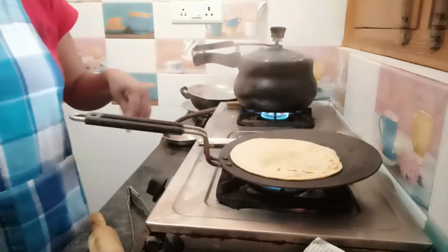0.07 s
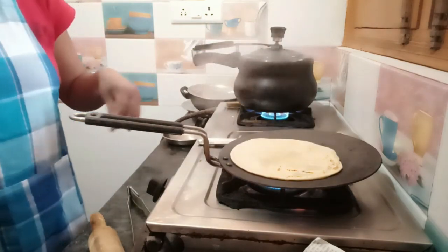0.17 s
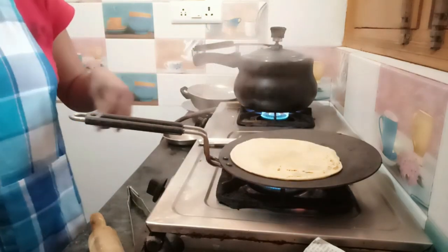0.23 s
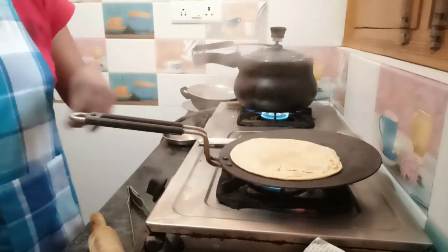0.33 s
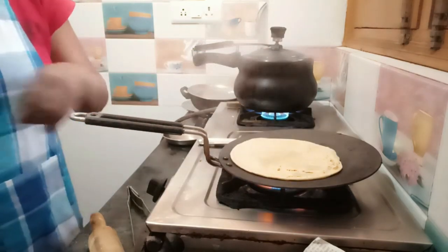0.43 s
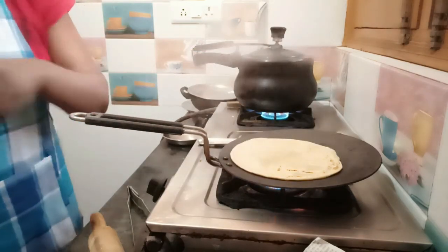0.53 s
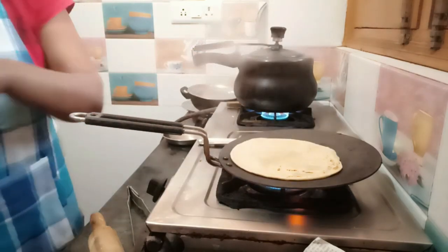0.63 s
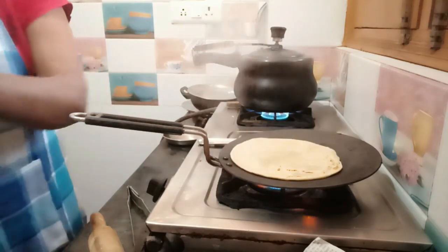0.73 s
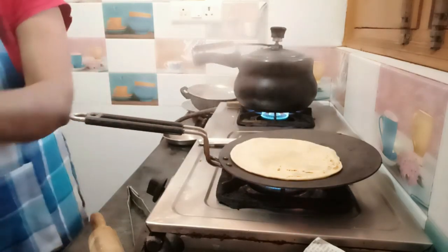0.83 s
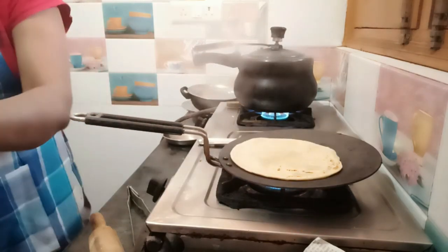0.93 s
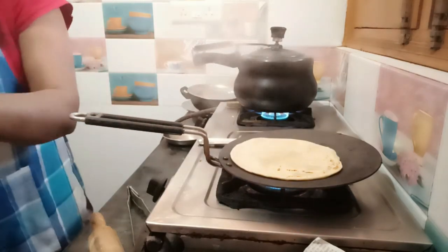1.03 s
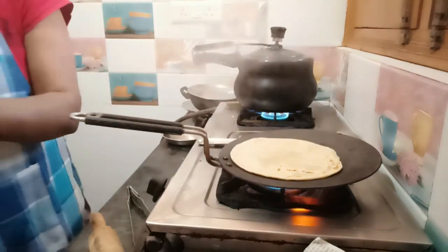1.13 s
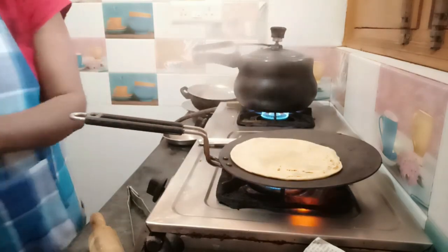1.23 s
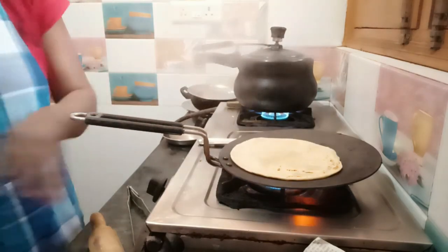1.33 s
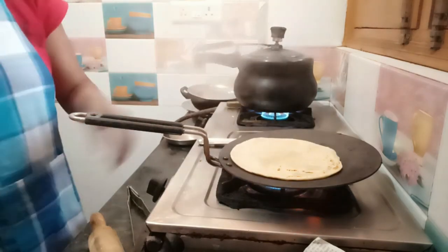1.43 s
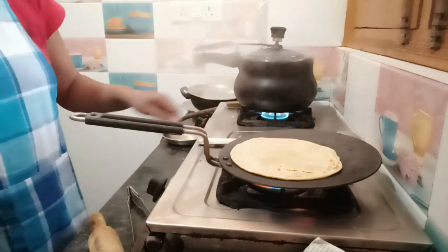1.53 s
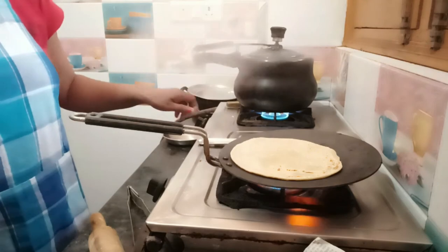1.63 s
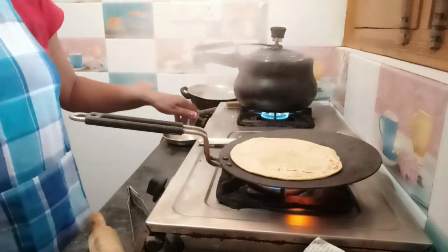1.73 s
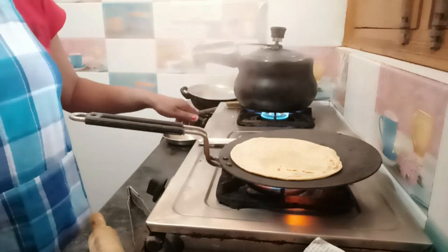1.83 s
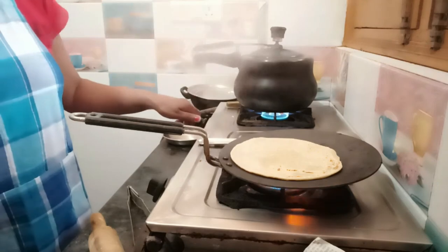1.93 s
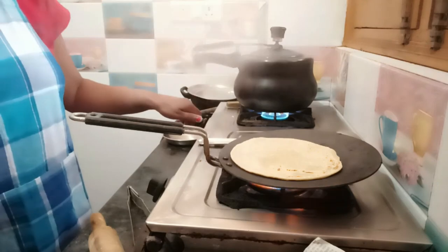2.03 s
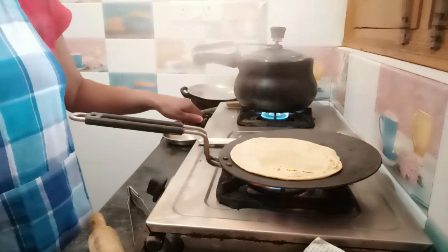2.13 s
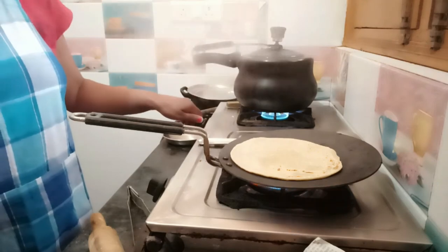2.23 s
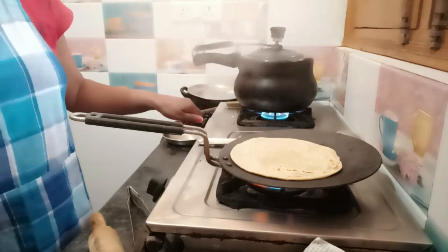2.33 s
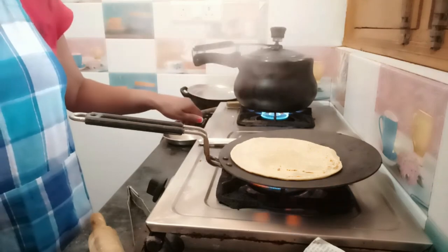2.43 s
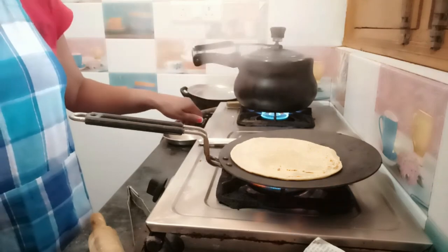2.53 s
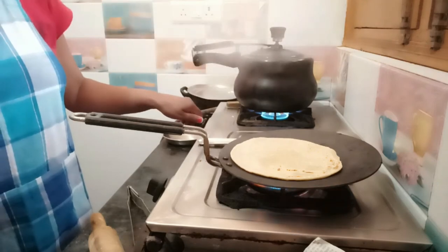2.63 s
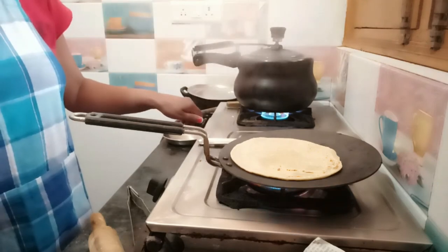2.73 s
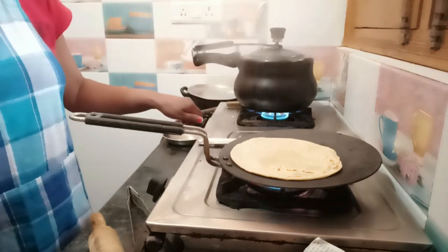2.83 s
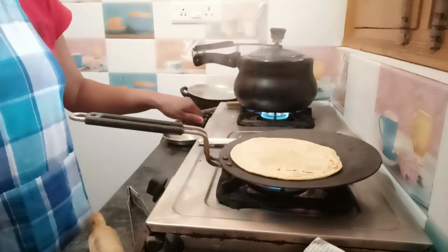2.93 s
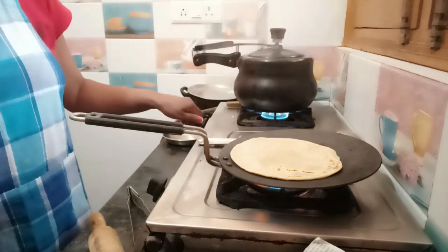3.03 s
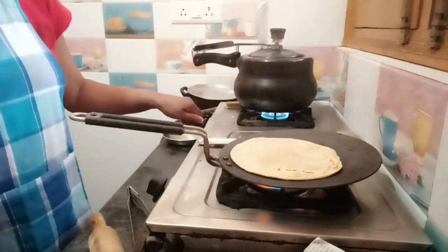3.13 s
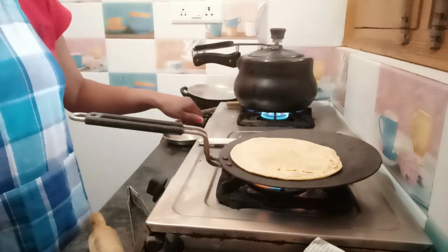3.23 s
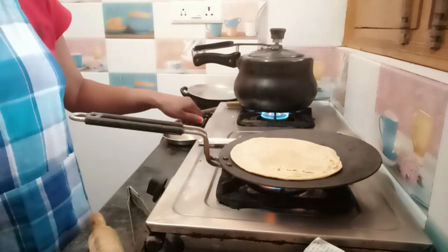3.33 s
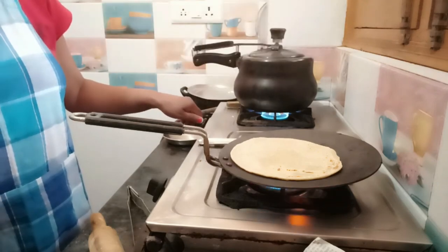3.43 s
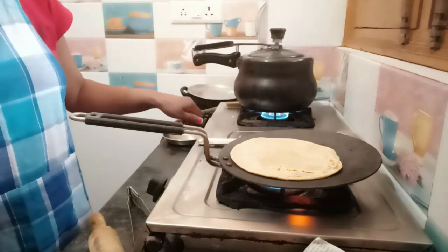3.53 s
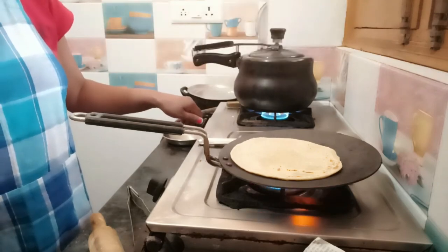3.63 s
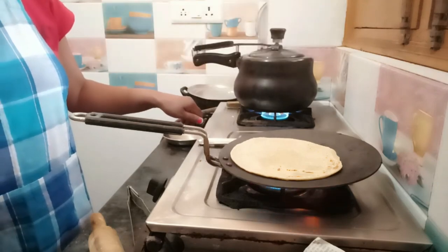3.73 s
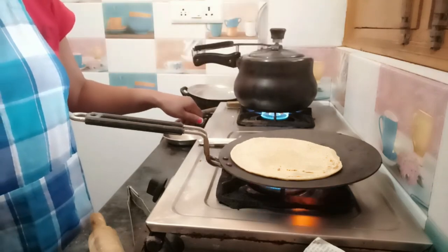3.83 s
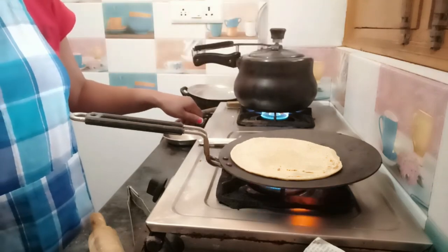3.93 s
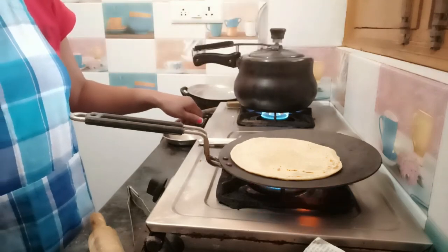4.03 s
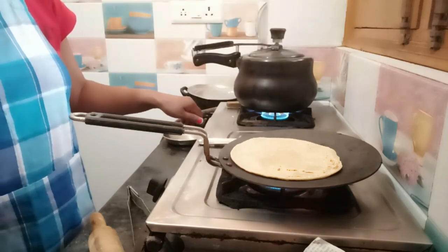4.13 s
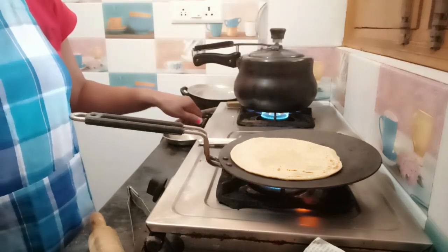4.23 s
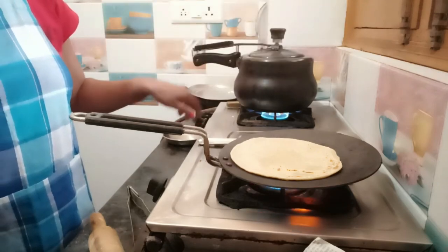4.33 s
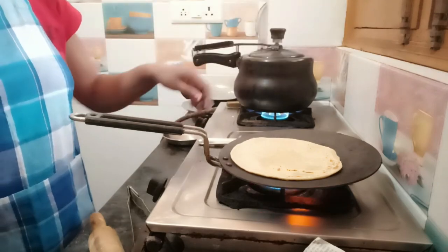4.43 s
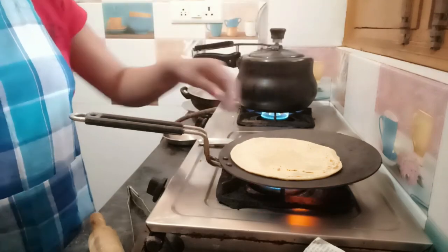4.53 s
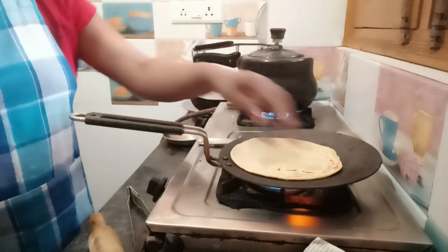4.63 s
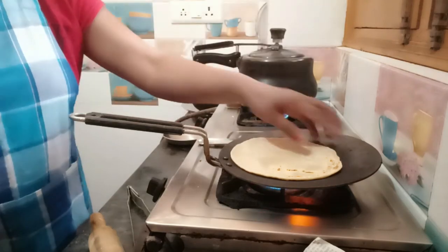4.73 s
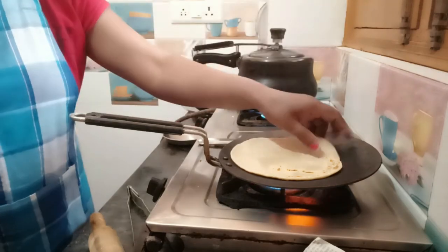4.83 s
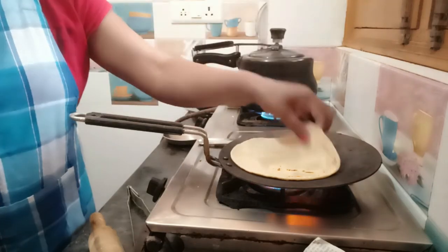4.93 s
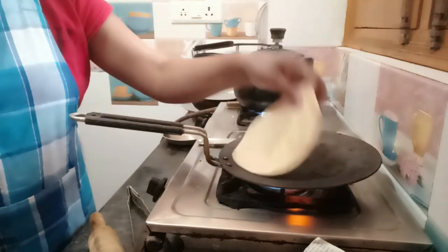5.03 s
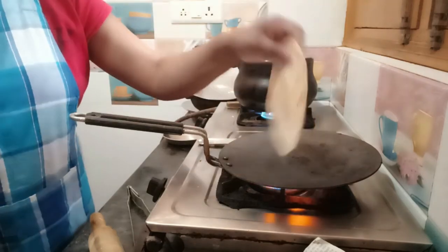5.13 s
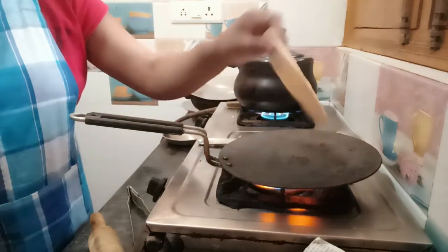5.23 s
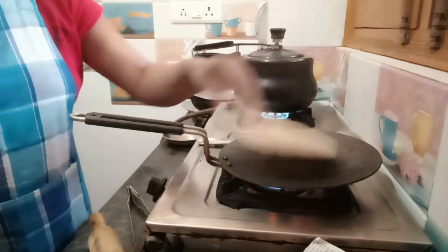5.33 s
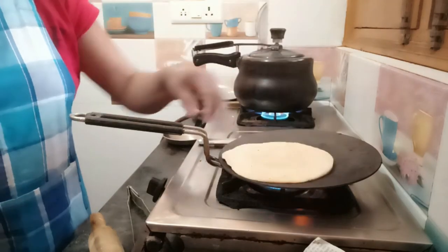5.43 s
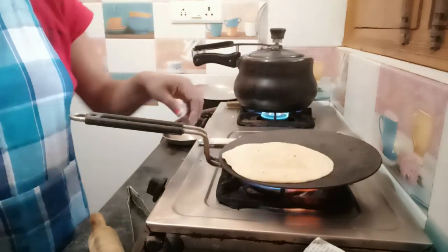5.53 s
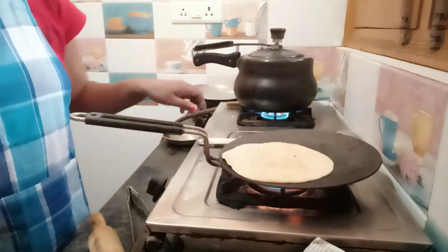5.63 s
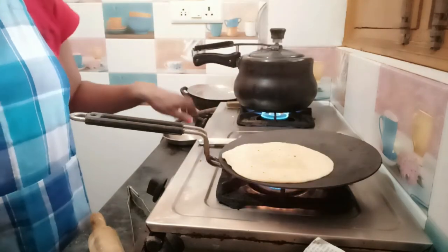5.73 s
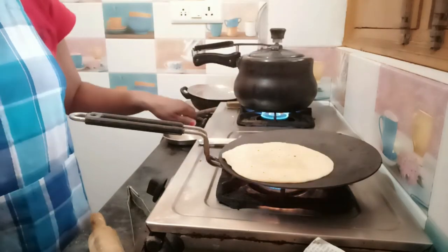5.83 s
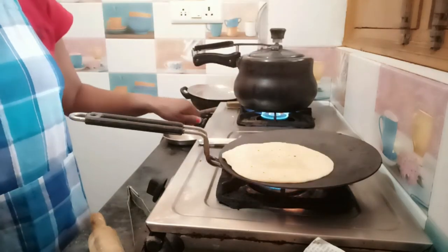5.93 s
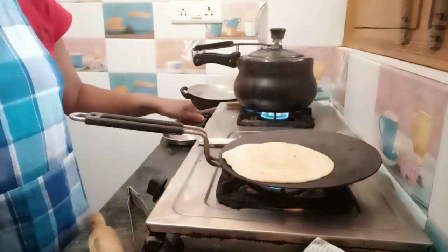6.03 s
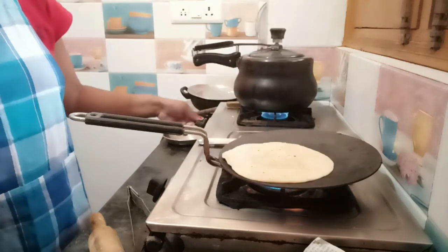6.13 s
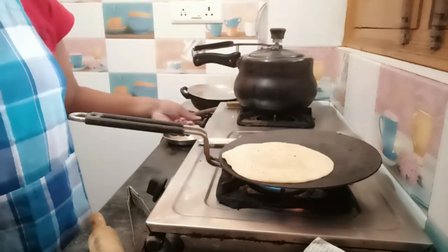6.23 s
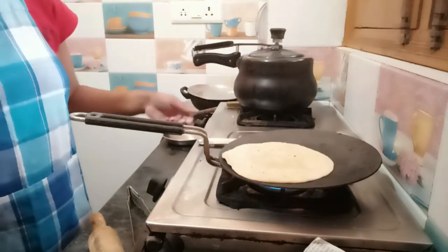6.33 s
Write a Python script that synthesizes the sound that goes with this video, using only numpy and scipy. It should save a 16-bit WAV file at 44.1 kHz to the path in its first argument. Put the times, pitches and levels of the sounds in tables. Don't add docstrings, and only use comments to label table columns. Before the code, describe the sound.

Broadband steam roar dominates the first half, growing slightly, with faint low bumps on the phone beneath it. It stops abruptly with small dull clunks and a short room tail. Thin airy hiss and soft gas roar swell gently back. Light dull taps cluster, a floppy bread lands with a sharp slap and thud, then muffled metal clinks and short scrapes finish. Close stereo phone pickup in a hard kitchen.

```python
import sys
import numpy as np
from scipy import signal
from scipy.fft import rfft, irfft, next_fast_len
from scipy.io import wavfile
from scipy.ndimage import uniform_filter1d

SR = 44100
rng = np.random.default_rng(int(sys.argv[2]) if len(sys.argv) > 2 else 0)


def master_out(mix):
    frames = np.transpose(np.atleast_2d(mix))
    ceiling = np.clip(frames, -1, 1)
    pcm = np.round(ceiling * 32767).astype(np.int16)
    wavfile.write(sys.argv[1], SR, pcm)


def voltage_ratio(decibels):
    exponent = np.asarray(decibels, float) / 20
    return 10 ** exponent


N = 280917
DROP_S = 2.777

# [f/Hz, level/dB, t60/s]
STOVE_MODES = [(96.3, -0.5, 0.28), (132.2, 0, .26), (206.8, -2.5, 0.14), (223.2, 0.5, .33),
               (240.4, -1.5, 0.21), (279, -1.5, 0.079), (331.6, -4, 0.24), (381, -8, 0.34),
               (402.5, -6, 0.4), (410, 2.5, 0.15)]


def along(table, hz):
    f, v = np.transpose(table)
    return np.interp(np.log(np.maximum(hz, 1)), np.log(np.maximum(f, 1)), v)


def walk(rate):
    k = int(SR / rate)
    held = np.repeat(rng.standard_normal(N // k + 1), k)
    return 1.6 * uniform_filter1d(uniform_filter1d(held, k), k)[:N]


def ring(x, hz, t60):
    r = np.exp(-np.log(1000) / (t60 * SR))
    w = 2 * np.pi * hz / SR
    return signal.lfilter([0, r * np.sin(w)], [1, -2 * r * np.cos(w), r * r], x)


def turbulence(colour, side, balance, swell_db, flicker_db, flicker_rate, body_db=0, linger_db=0):
    # [f/Hz, width/Hz, level/dB]
    port_dips = [(1031, 80, -4), (2500, 110, -5), (3190, 62, -5), (4050, 200, 2), (4720, 140, -3),
                 (5053, 110, -5), (5700, 140, -0.5), (6850, 220, 1.5)]
    shared = 0.27
    ripple_db, ripple_hz = 2.5, 40.23
    size = next_fast_len(N)
    hz = np.arange(size // 2 + 1) * SR / size
    inside = (hz >= colour[0][0]) * (hz <= colour[-1][0])
    mid, sid = rfft(rng.standard_normal((2, size))) * voltage_ratio(along(colour, hz)) * inside
    sid = (np.sqrt(1 - shared) * sid - 1j * np.sqrt(shared) * mid) * voltage_ratio(along(side, hz))
    span = int(ripple_hz * size / SR)
    ripple = voltage_ratio(ripple_db * np.sqrt(span) * uniform_filter1d(rng.standard_normal(len(hz)), span))
    mid, sid = mid * ripple, sid * ripple
    mid = mid * voltage_ratio(sum(db * np.exp(-((hz - at) / width) ** 2) for at, width, db in port_dips))
    pair = np.array([mid + sid, mid - sid]) * voltage_ratio(np.outer([.5, -.5], along(balance, hz)))
    place = 2 * np.log2(np.maximum(hz, 1))
    swell = swell_db * walk(9.0)
    out, still = 0, 0
    for k in range(int(place[inside].min()), int(place[inside].max()) + 2):
        window = np.cos(np.pi / 2 * np.clip(place - k, -1, 1)) ** 2
        band = irfft(pair * window, size)[:, :N]
        is_body = k < 23
        band = band * voltage_ratio(swell + flicker_db * walk(flicker_rate) + body_db * is_body)
        out = out + band * voltage_ratio(linger_db * is_body)
        still = still + band
    return out / np.std(still.mean(axis=0))


def steam(t):
    # [f/Hz, level/dB per Hz]
    jet_colour = [(590, -76), (1000, -36), (1330, -21), (1440, -25), (2260, -15), (2710, -6.5), (3410, -5),
                  (5040, -5.5), (6630, -5), (8440, -4), (9690, -14), (10600, -5.5), (12500, -2.5),
                  (14800, 0.5), (15500, -0.5)]
    # [f/Hz, level/dB per Hz]
    jet_low = [(90, -17), (150, -8.5), (220, -5.5), (330, -9), (520, -1), (680, -5), (820, -2.5),
               (950, -11), (1150, -10.5)]
    # [f/Hz, level/dB per Hz]
    leak_colour = [(410, -67), (700, -50), (907, -23), (993, -31), (1370, -17), (1520, -23.5),
                   (1970, -18.5), (2130, -18.5), (3270, -7), (4700, -10.5), (7310, -4), (8430, -0.5),
                   (9980, -15), (13300, -2), (15500, -1.5)]
    # [f/Hz, side minus mid/dB]
    jet_side = [(500, -3), (1000, -0.5), (1500, -2.5), (2400, -2), (7000, 0.5), (8000, -2.5), (9500, 2),
                (10500, -0.5), (13500, 0.5), (15000, -2)]
    leak_side = [(700, -2), (1000, 4.5), (1500, -4.5), (2400, -1), (6500, 0.5), (8000, -3.5), (10300, -0.5),
                 (12500, -2), (13800, -1), (15000, -4.5)]
    # [f/Hz, left minus right/dB]
    jet_balance = [(700, 5), (1300, 4), (2200, 1.5), (3000, -1), (3600, 3.5), (4000, -1.5), (5600, 1.5),
                   (6300, -7.5), (7200, -4), (8700, -4.5), (9100, 5.5), (10100, -6.5), (10700, 1.5),
                   (12000, 5), (15000, -3)]
    leak_balance = [(700, -5), (1300, 3), (3000, -1.5), (3600, 4.5), (4000, -2.5), (5600, 0), (6300, -7.5),
                    (7200, -6), (8000, -6), (9100, -6), (10700, 14), (12000, -0.5), (14200, 3.5),
                    (14700, -1.5)]
    jet_t60_s, body_t60_s = 0.25, 0.5
    jet_body_db, leak_body_db = 1.2, 3
    after = np.maximum(t - DROP_S, 0)
    linger_db = 60 * after * (1 / jet_t60_s - 1 / body_t60_s) * (after < 1)
    jet = turbulence(jet_colour, jet_side, jet_balance, 0.5, 0.9, 18, jet_body_db, linger_db)
    rumble = turbulence(jet_low, [(100, 0.68), (900, -2)], [(100, 0.16), (900, 0.68)], .5, 1.2, 10)
    jet = jet + voltage_ratio(-33.3) * rumble
    leak = turbulence(leak_colour, leak_side, leak_balance, 0.44, 0.58, 15, leak_body_db)
    jet_db = -19.0 + 0.51 * t - 2.4 * np.exp(-t / 0.044) - 60 * after / jet_t60_s
    leak_db = -39.0 + 0.53 * (t - t[-1]) + phone_gain_db(t)
    return voltage_ratio(jet_db) * jet + voltage_ratio(leak_db) * leak


def touches():
    # [t/s, level near 220 Hz/dB, hardness: extra dB per octave above 220 Hz]
    weight = [
        (2.822, -42, -2),
        (2.856, -45.5, 0.1),
        (2.944, -56.5, 5.5),
    ]
    hand = [(3.302, -55, -10), (3.423, -48.5, -6), (4.258, -35.5, 2.5), (4.287, -41, 3.5),
            (4.329, -42.5, -1), (4.698, -34.5, -4), (4.712, -37.5, 2), (4.735, -35.5, 2.5),
            (4.757, -35, -2), (4.79, -32.5, -3.5), (4.825, -40, -4.5), (4.859, -37, -6),
            (5.599, -44.5, -5.5), (5.71, -31.5, -0.5), (5.75, -44.5, 2.5)]
    bread = [
        (5.317, -27, 3),
        (5.33, -21, -1),
        (5.349, -25.5, 1.5),
        (5.373, -31, 4),
        (5.405, -28, -3.0),
        (5.435, -32.5, -0.5),
        (5.473, -36, 0),
    ]
    spoon = [(5.862, -36.5, -5.0), (5.894, -43, 3.5), (5.908, -33, 2.5), (5.945, -33.5, 5.5),
             (5.995, -40, 5.0), (6.04, -39, -5), (6.068, -25.5, -0.5), (6.11, -33, -2.0), (6.149, -36, -1),
             (6.185, -23.5, 1), (6.209, -29, 2.0), (6.231, -33, 1.0), (6.294, -36.5, -2)]
    # near 110, 400 and 650 Hz, then the slap above 1.2 kHz, all dB
    things = [(weight, (-14, 2.5, 0, 1)), (hand, (-13.5, -6.5, -6.5, -16.5)),
              (bread, (1, -11, -14.5, -13)), (spoon, (-30, -8, -3.5, -18))]
    octaves = np.log2(np.array([220, 400, 650, 1000]) / 220)
    return np.array([[s, db, *(colour + hard * octaves)] for rows, colour in things for s, db, hard in rows])


def knocks():
    # [f/Hz, level/dB, t60/s]
    upper_modes = [(507, -8.5, 0.32), (559, -1, 0.18), (579, 1, 0.064), (599.7, 6, 0.16), (670, -22, 0.5),
                   (706, -6, 0.12), (806, -3.5, 0.13), (891, -9.5, 0.15), (1330, -9, 0.19),
                   (2340, -3, 0.047)]
    regions_hz = [115, 223, 390, 650, 920, 1350]
    rows = touches()
    level_db, low_db, mid_db, slap_db = rows[:, 1:2], rows[:, 2:3], rows[:, 3:4], rows[:, 5:6]
    at = (rows[:, 0] * SR).astype(int)[:, None] + np.arange(4096)
    age = np.arange(4096) / SR
    push = (1 - np.exp(-age / .003)) * np.exp(-age / .006)
    region_db = np.hstack([low_db, 0 * level_db, rows[:, 3:5], rows[:, 4:6]]) + level_db
    out = np.zeros((2, N))
    for hz, db, t60 in STOVE_MODES + upper_modes:
        place_db = np.array([np.interp(np.log(hz), np.log(regions_hz), r) for r in region_db])
        chance = rng.standard_normal((len(rows), 4096))
        steady = push * np.cos(2 * np.pi * hz * age + 6 * chance[:, :1]) * 2 / push.sum()
        chatter = push * chance / np.sqrt(np.sum(push ** 2))
        strength = voltage_ratio(place_db[:, None] + 2.1 * chance[:, 1:2])
        blow = np.zeros(N + 4096)
        np.add.at(blow, at, (0.82 * steady + 0.5 * chatter) * strength)
        mode = ring(blow[:N], hz, t60) * voltage_ratio(db - 6.5)
        far_port = np.roll(mode, int(rng.integers(-16, 17)))
        out = out + np.array([mode * voltage_ratio(1.3 * hz / 600), far_port])
    out = signal.sosfilt(signal.butter(4, 75, "highpass", fs=SR, output="sos"), out)
    thud = np.zeros(N + 4096)
    thud_shape = (1 - np.exp(-age / 0.0017)) * np.exp(-age / .022)
    np.add.at(thud, at, voltage_ratio(level_db + np.minimum(mid_db, 0)) * thud_shape)
    dull = signal.butter(2, [150, 850], "bandpass", fs=SR, output="sos")
    rustle = signal.sosfilt(dull, rng.standard_normal(N))
    out = out + voltage_ratio(3.0) * thud[:N] * np.array([rustle, np.roll(rustle, 12)])
    slap = np.zeros(N + 4096)
    slap_shape = np.exp(-age / 0.023) + 0.37 * np.exp(-age / 0.0036)
    np.add.at(slap, at, voltage_ratio(level_db + slap_db) * slap_shape)
    papery = signal.butter(2, [1300, 3200], "bandpass", fs=SR, output="sos")
    return out + voltage_ratio(2.0) * slap[:N] * signal.sosfilt(papery, rng.standard_normal((2, N)))


def bumps(t):
    # [t/s, level/dB, push length/s (negative for a pull)]
    stand_bumps = [
        (0.384, -34.5, .006),
        (0.404, -38, -0.015),
        (.45, -47, 0.015),
        (0.721, -37, .006),
        (0.831, -48, .008),
        (0.89, -38, .005),
        (5.327, -31.5, 0.027),
    ]
    out = 0
    rattle = signal.sosfilt(signal.butter(2, 550, fs=SR, output="sos"), rng.standard_normal(N))
    for s, db, length in stand_bumps:
        u = np.clip((t - s) / abs(length), 0, None)
        push = np.sign(length) * np.sin(np.pi * u ** 0.48) * np.exp(-u / 2.0)
        out = out + voltage_ratio(db) * (push + 2.8 * rattle * np.exp(-np.abs(t - s) / 0.013))
    crack_s, crack_fade_s = 5.32, 0.0054
    crack_shape = np.clip((t - crack_s) / 0.0028, 0, 1) * np.exp(-np.abs(t - crack_s) / crack_fade_s)
    crack = voltage_ratio(-20.0) * crack_shape * rng.standard_normal((2, N))
    return out * voltage_ratio(np.array([[-2.5], [2.5]])) + crack


def scrape(t):
    # [start t/s, length/s, level/dB, upper resonances re the lowest/dB]
    strokes = [
        (4.704, 0.076, -59, 3.5),
        (5.9, 0.015, -52, -5),
        (5.938, 0.074, -43, -6),
        (6.068, 0.04, -46, 7),
        (6.184, 0.03, -51.5, 6),
    ]
    attack_s, release_s = 0.0043, 0.03
    slips = rng.standard_normal((2, N)) * voltage_ratio(3.0 * walk(90))
    low = ring(slips, 1350, 0.04)
    high = ring(slips, 2450, 0.011) + 0.5 * ring(slips, 1900, 0.011) + 0.4 * ring(slips, 3200, 0.01)
    low, high = low / np.std(low), high / np.std(high)
    out = 0
    for s, length, db, high_db in strokes:
        press = np.clip((t - s) / attack_s, 0, 1) * np.exp(-np.maximum(t - s - length, 0) / release_s)
        out = out + voltage_ratio(db) * press * (low + voltage_ratio(high_db) * high) * 0.7
    return out


def flames(t):
    # [f/Hz, level/dB per Hz]
    flame_colour = [(12, -44), (20, -18), (69, -21.0), (98, -10.5), (174, -5.0), (229, 0.5), (266, -13.0),
                    (448, -6.5), (600, -11.5), (906, -20), (1000, -23.0), (1300, -66.5), (2200, -120)][1:-1]
    side, balance = [(50, -30), (200, -12.5), (1000, 0)], [(50, 0.038), (1000, 2.7)]
    roar = turbulence(flame_colour, side, balance, 0.99, 2.6, 11)
    hum = sum(voltage_ratio(db) * ring(rng.standard_normal(N), hz, t60) for hz, db, t60 in STOVE_MODES[:9])
    creep_db = -52 + 1.93 * (np.maximum(t, DROP_S) - t[-1])
    return (roar + voltage_ratio(-1.5) * hum / np.std(hum)) * voltage_ratio(creep_db + 0.6 * phone_gain_db(t))


def phone_gain_db(t):
    return -8.5 * np.exp(-np.maximum(t - DROP_S - 0.24, 0) / 0.68)


def starve(x):
    # [f/Hz, level re the frame's mean line/dB]
    weak_line_db = [(40, -14), (150, -14), (500, -13), (1000, -14), (1400, -13), (2000, -11), (3200, -7),
                    (5000, -5), (7000, -12), (9600, -8), (12000, -12), (15000, -12)]
    hop, grid = 1024, 248
    top_hz, joint_hz, mood_db = 15620, 6900, 2.5
    n, k = np.arange(2 * hop), np.arange(hop)
    window = np.sin(np.pi * (n + .5) / (2 * hop))
    basis = window * np.cos(np.pi / hop * np.outer(k + .5, n + .5 + hop / 2))
    pad = np.pad(x, ((0, 0), (2 * hop - grid, 3 * hop)))
    at = hop * np.arange(pad.shape[1] // hop - 1)[:, None] + n
    left, right = pad[:, at] @ basis.T + 1e-18
    hz = (k + .5) * SR / (2 * hop)
    band = np.where(k < 256, (9 * np.log2(1 + hz / 700)).astype(int), 24 + k // 32)
    band = np.unique(band, return_inverse=True)[1]
    count = band.max() + 1
    member = np.eye(count)[band]
    mood = uniform_filter1d(rng.standard_normal((3, len(at), count)), size=2, axis=1)
    mood = mood[..., band] * np.sqrt(2)
    sign = np.sign(left * right @ member)
    scale = np.sqrt(right ** 2 @ member / (left ** 2 @ member))
    copy = left * (sign * scale)[:, band]
    right = np.where((hz > joint_hz) * (mood[2] < 1.0), copy, right)
    lines = np.array([left + right, left - right]) / 2
    mean = np.sqrt(np.mean(lines ** 2, axis=(0, 2), keepdims=True))
    step = 2 * mean * voltage_ratio(along(weak_line_db, hz) + mood_db * mood[:2])
    frames = (step * np.round(lines / step) * (hz < top_hz)) @ basis * 2 / hop
    out = np.zeros_like(pad)
    out[:, at[:, :hop]] += frames[..., :hop]
    out[:, at[:, hop:]] += frames[..., hop:]
    mid, side = out[:, 2 * hop - grid:][:, :N]
    return np.array([mid + side, mid - side])


def scene():
    t = np.arange(N) / SR
    return steam(t) + flames(t) + knocks() + bumps(t) + scrape(t)


def band_limit(x):
    return signal.sosfilt(signal.butter(12, 16710, fs=SR, output="sos"), x)


def record(dry):
    mix = starve(dry)
    return band_limit(mix)


dry = scene()
out = record(dry)
master_out(out)
```